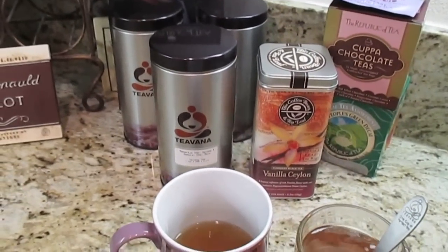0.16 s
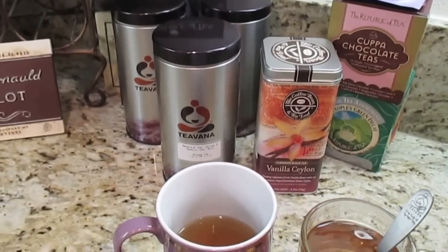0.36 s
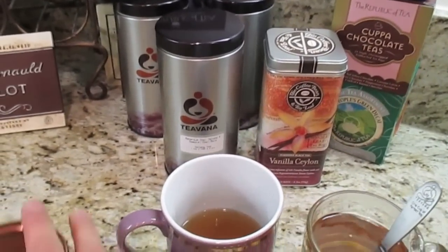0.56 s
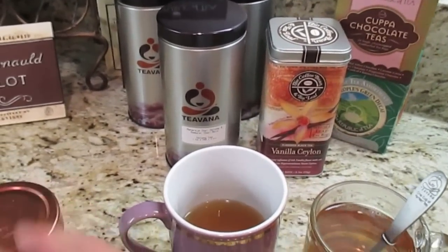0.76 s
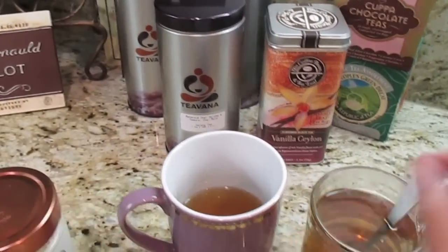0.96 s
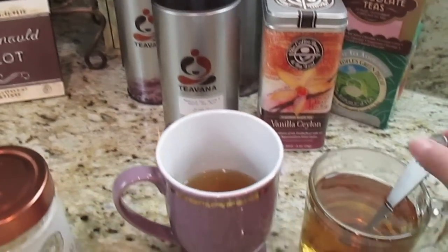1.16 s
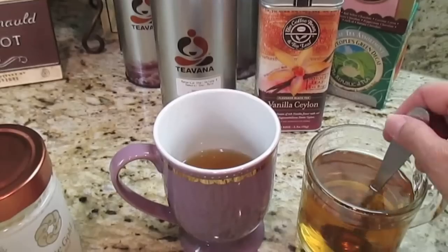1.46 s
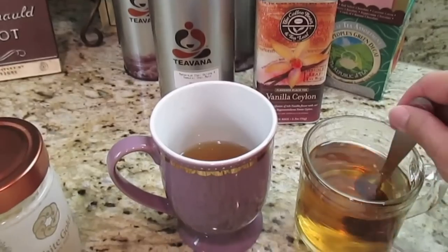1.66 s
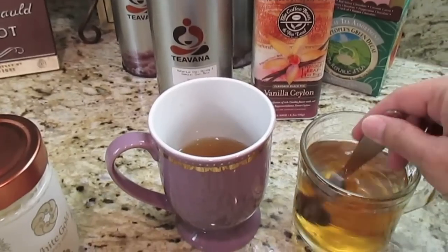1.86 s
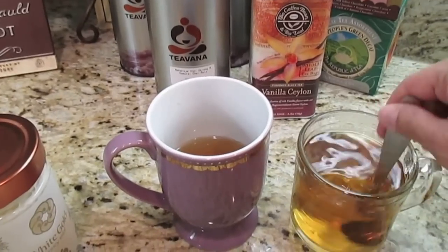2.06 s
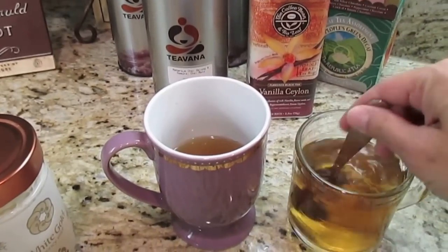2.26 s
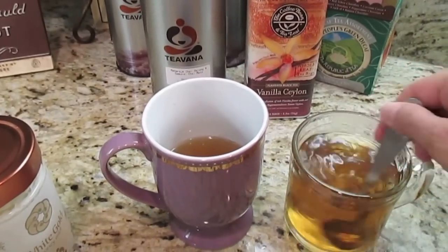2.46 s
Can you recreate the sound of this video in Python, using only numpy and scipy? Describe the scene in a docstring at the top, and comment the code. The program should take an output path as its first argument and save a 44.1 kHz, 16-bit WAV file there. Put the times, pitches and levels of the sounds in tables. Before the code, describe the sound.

A metal spoon clinks in a glass mug of tea. First, a faint bump, then a loud, clipped hollow bang at 0.23 s as a jar lands on stone, small ticks and a rocking bump near 0.4, and a scrape fading by 0.9. Near quiet with low room hum; faint spoon ticks around 1.4. Bright double clink at 1.65, then irregular ringing clinks, bottom knocks and soft rubbing from 1.93 to 2.6.

```python
"""A jar is put down hard on a stone counter, close by, rocks a few times and is slid aside: modes and noise.
Then a spoon is gripped and stirred in a glass mug of tea: it clinks on the wall and knocks the bottom,
as decaying sine modes with noise cracks and thuds. Small ticks and rubbing noise go with both.
A quiet room hums and rustles; the recorder clips the bang and its gain ducks after loud sounds."""
import sys
import numpy as np
from scipy import signal
from scipy.fft import rfft, irfft, next_fast_len
from scipy.io import wavfile
from scipy.ndimage import uniform_filter1d, map_coordinates

SR = 44100
rng = np.random.default_rng(int(sys.argv[2]) if len(sys.argv) > 2 else 0)


def volts_from_db(level):
    """Convert decibel levels to linear amplitude ratios."""
    exponent = np.asarray(level, float) / 20
    return 10 ** exponent


def materialize(psi):
    """Save the field psi as 16-bit PCM at rate SR to the path in sys.argv[1].

    A 1-D psi becomes a single channel; in a 2-D psi each row is a channel.
    """
    bounded = np.clip(np.atleast_2d(psi).T, -1, 1)
    quanta = np.round(bounded * 32767).astype(np.int16)
    wavfile.write(sys.argv[1], SR, quanta)


N = 114660
STRIKE_S = 0.0012  # rise time constant of a hard contact
FLUTTER_PER_S = 140


def unit(x):
    """Scale to rms 1."""
    return x / np.sqrt(np.mean(x ** 2) + 1e-20)


def along(points, hz):
    """Interpolate (hz, value) points on a log frequency axis."""
    point_hz, value = np.transpose(points)
    return np.interp(np.log(hz + 1), np.log(point_hz + 1), value)


def curve(rows):
    """Interpolate (s, value) rows to one value per sample."""
    return np.interp(np.arange(N) / SR, *np.transpose(rows))


def wobble(rate):
    """A smooth random curve, rate knots a second."""
    knots = rng.standard_normal(int(N * rate / SR) + 4)
    return map_coordinates(knots, [np.arange(N) * rate / SR])


def noise(spectrum, n=N):
    """Coloured noise of rms 1 that fades out above the last point."""
    m = next_fast_len(n + 2048)
    closed = list(spectrum) + [(4 * spectrum[-1][0], -100)]
    gain = volts_from_db(along(closed, np.fft.rfftfreq(m, 1 / SR)))
    return unit(irfft(rfft(rng.standard_normal(m)) * gain, m)[:n])


def add(out, start_s, db, modes, attack_s, scatter_db=0, clock=None, flutter_db=0):
    """Ring decaying modes from start_s; clock bends their pitch, flutter shakes each level at random."""
    i = round(start_s * SR)
    t = np.arange(min(N - i, SR // 2)) / SR
    bent_t = t if clock is None else clock[i:i + len(t)] - clock[i]
    hz, level_db, t60_s = np.transpose(modes)[:, :, None]
    knots = rng.standard_normal((len(hz), 200))
    shake = np.array([np.interp(t * FLUTTER_PER_S, np.arange(len(k)), k) for k in knots])
    level_db = level_db + scatter_db * rng.standard_normal(hz.shape) + flutter_db * shake
    rings = volts_from_db(db + level_db - 60 * t / t60_s) * np.sin(2 * np.pi * hz * bent_t)
    out[i:i + len(t)] += rings.sum(0) * (1 - np.exp(-t / attack_s))


def burst(start_s, db, spectrum, t60_s):
    """A puff of noise that starts at start_s and dies."""
    t = np.arange(SR // 5) / SR
    envelope = volts_from_db(db - 60 * t / t60_s) * (1 - np.exp(-2 * t / STRIKE_S))
    return np.pad(envelope * noise(spectrum, len(t)), (round(start_s * SR), N))[:N]


def chatter(ring):
    """The blow followed by a dying spray of small contacts."""
    level_db, t60_s = -5, 0.035
    n = SR // 20
    spray = rng.standard_normal(n) ** 3 * volts_from_db(-60 * np.arange(n) / SR / t60_s)
    return ring + volts_from_db(level_db) * signal.fftconvolve(ring, spray / np.linalg.norm(spray))[:N]


# spoon on glass: start_s, glass_db, spoon_db, bowl_pitch_hz, upper_mode_lean_db
CLINKS = [(1.646, -23, -21, 5420, 8.5), (1.662, -22.5, -20.5, 5437, -4), (1.9322, -35.5, -35.5, 5310, 8),
          (2.067, -30, -27.5, 5520, 4), (2.149, -33.5, -36, 5180, 3.5), (2.191, -22.5, -20, 5060, 0),
          (2.3538, -33, -35.5, 5500, -8), (2.4417, -53, -33, 5220, 4), (2.478, -29, -29.5, 5270, 6.5),
          (2.569, -30.5, -27.5, 5540, 4.5)]
# glass wall modes, in pairs: pitch_hz, level_db, t60_s
GLASS = [(1871, -8, 0.34), (1975, -11, 0.62), (4693, -0.5, 0.24), (4714, 0, 0.26), (8700, -6, 0.09),
         (8480, -7.5, 0.24)]
# spoon modes: pitch_hz, level_db, t60_s
SPOON = [(1345, -5, .12), (2040, -5, .05), (3905, -10, .075), (7020, -7, .18), (9290, -8, .12),
         (11250, -8, .055), (12350, -14, .11)]
# tea climbing the wall loads the glass: time_s, pitch_ratio
SWIRL = [(2.0, 1), (2.2, .989), (2.6, .989)]
# contact noise spectrum: freq_hz, level_db
CRACK = [(500, -20), (1200, -6.5), (4000, -1.5), (10000, -7.5), (16000, -21)]


def clinks():
    """Each contact rings the glass and the spoon, with a noise crack and chatter on the spoon."""
    scatter_db, soft_from_db = 2.5, -22
    soft_db_per_octave = 0.94  # treble lost on the glass for each dB of a weaker blow
    out, clock = np.zeros(N), np.cumsum(curve(SWIRL)) / SR
    upper = np.resize([-1, 1], len(GLASS))[:, None] * [0, 1, 0]
    octaves = np.log2(np.array(GLASS)[:, :1] / GLASS[0][0]) * [0, 1, 0]
    for start_s, glass_db, spoon_db, bowl_hz, lean_db in CLINKS:
        softening = soft_db_per_octave * (glass_db - soft_from_db) * octaves
        glass = np.array(GLASS) + lean_db * upper + softening
        add(out, start_s, glass_db, glass, STRIKE_S, scatter_db / 2, clock, flutter_db=1.5)
        ring = np.zeros(N)
        # the spoon's ring is rough, its level shaking at random
        add(ring, start_s, spoon_db, SPOON, STRIKE_S, scatter_db, flutter_db=4)
        add(ring, start_s, spoon_db - 5, [(bowl_hz, 0, 0.045)], STRIKE_S)
        # short partials, new at every contact
        rattle_hz = np.exp(rng.uniform(np.log(1107.5), np.log(13914), size=16))
        rattle = [(hz, -15.5, 0.068) for hz in rattle_hz]
        add(ring, start_s, spoon_db, rattle, STRIKE_S, scatter_db)
        crack = burst(start_s, spoon_db - 2.5, CRACK, t60_s=0.07)
        out = out + chatter(ring) + crack
    return out


# spoon bowl on the mug bottom: start_s, level_db, stem_db
KNOCKS = [(1.649, -31.5, -25.5), (1.934, -33.5, -24), (2.190, -26, -14), (2.355, -33, -27),
          (2.442, -19.5, -44), (2.449, -21.5, -53), (2.477, -24, -39), (2.572, -24.5, -28)]
# mug and counter modes: pitch_hz, level_db, t60_s
BASE = [(284.6, -10, .06), (510, -1, .06), (743, 0, .05), (862, -5, .06), (1060, -4, .05), (1395, -9, .07)]
# spectrum of thuds and brisk rubbing: freq_hz, level_db
WIDE = [(90, -15), (220, -8), (800, 1), (1150, -8.5), (2500, -16.5)]


def knocks():
    """Each knock rings mug and counter under the spoon stem's thin high ring, with a dull noise thud."""
    out = np.zeros(N)
    for start_s, db, stem_db in KNOCKS:
        add(out, start_s, stem_db, [(9050, 0, 0.12)], STRIKE_S, flutter_db=2)
        detune = 0.02 * rng.standard_normal((len(BASE), 1)) * [1, 0, 0]
        add(out, start_s, db, np.array(BASE) * (1 + detune), STRIKE_S, scatter_db=1.25, flutter_db=4)
        out = out + burst(start_s, db - 4, WIDE, t60_s=0.075)
    return out


# jar on stone: start_s, level_db, edge_slap_db
BUMPS = [(0.019, -27, -71), (.226, -7.5, -24), (0.2324, 8.5, -14), (0.436, -20, -48)]
# jar modes: pitch_hz, level_db, t60_s
JAR = [(95, -30, 0.23), (300, -14, 0.05), (430, -8, .035), (517.7, 3.5, .031), (640, -10, 0.03),
       (849, -8, .04), (1012, -12, .04)]
# hard edge noise spectrum: freq_hz, level_db
SLAP = [(700, -21), (1400, -6), (5300, -9.5), (11000, -18.5), (16000, -37)]


def jar():
    """Hollow bumps of short low modes, with a noise slap as the hard edge lands."""
    out = np.zeros(N)
    for start_s, db, slap_db in BUMPS:
        add(out, start_s, db, JAR, attack_s=0.0022)
        out = out + burst(start_s, slap_db, SLAP, t60_s=0.086)
    return out


# scuffs and ticks of jar, finger and nail: start_s, level_db, pitch_hz, t60_s
TICKS = [(0.18, -29.5, 980, 0.04), (.212, -13.5, 651, 0.08), (.371, -26.5, 820, 0.1),
         (.402, -25.5, 830, 0.045), (.436, -23, 952, 0.16), (.4365, -26.5, 1860, 0.09),
         (1.369, -40, 2256, 0.027), (1.464, -30.5, 5630, 0.014), (1.5, -26.5, 2850, 0.011)]


def ticks():
    """Short clicks, each a brief ring with noise around its pitch."""
    out = np.zeros(N)
    for start_s, db, hz, t60_s in TICKS:
        add(out, start_s, db, [(hz, 0, t60_s)], STRIKE_S)
        spectrum = [(hz * 0.15, -35), (hz, 0), (hz * 1.57, -14)]
        out = out + burst(start_s, db - 0.5, spectrum, t60_s)
    return out


# jar dragging on the stone: time_s, level_db
SLIDE = [(0, -43), (.05, -46.5), (.165, -60.5), (.19, -28), (.3, -29), (.46, -32), (.6, -35), (.76, -40),
         (.9, -63.5)]
# drag noise spectrum: freq_hz, level_db
DRAG = [(180, -22), (400, -8), (600, -5), (720, -9), (850, 0), (950, -11), (1065, 0), (1220, -18),
        (3000, -32)]


def jar_slide():
    """Jar rubbing on stone: lumpy noise in the band of the jar."""
    lumps = volts_from_db(2 * wobble(110))
    return volts_from_db(curve(SLIDE)) * unit(lumps * noise(DRAG))


# spoon and tea moving in the mug: time_s, level_db
RUB = [(1.22, -81), (1.3, -56), (1.9, -52), (1.96, -41), (2.1, -50.5), (2.33, -47.5), (2.38, -39),
       (2.6, -45.5)]
# slight movement spectrum: freq_hz, level_db
NARROW = [(330, -17), (550, -4.5), (750, -28)]


def mug_rub():
    """Spoon and tea moving: lumpy noise whose band widens as the movement gets louder."""
    wide_from_db = -50
    rub_db = curve(RUB)
    brisk = volts_from_db(2.76 * np.minimum(rub_db - wide_from_db, 0))
    lumps = volts_from_db(3 * wobble(70))
    return volts_from_db(rub_db) * lumps * (brisk * noise(WIDE) + (1 - brisk) * noise(NARROW))


# room answer decay: freq_hz, t60_s
ROOM = [(200, 0.32), (2000, 0.38), (12000, 0.22)]


def kitchen(x):
    """Room answer as a noise tail: each frequency dies at its own speed."""
    hz, t, z = signal.stft(rng.standard_normal(SR // 2), SR, nperseg=256)
    decay = volts_from_db(-60 * t / along(ROOM, hz)[:, None])
    tail = signal.istft(z * decay, SR, nperseg=256)[1]
    delayed = np.pad(x, (150, 0))
    return signal.fftconvolve(delayed, tail / np.linalg.norm(tail))[:N]


# room hush spectrum: freq_hz, level_db
HUSH = [(30, -36), (80, 0.5), (163, -4.5), (388, -14.5), (2200, -27), (4000, -34.5), (6400, -35),
        (11400, -48.5), (16300, -53)]
# wavering low hum: time_s, pitch_hz, level_db
RUMBLE = [(0, 52.2, -43.5), (.24, 56.4, -45), (0.328, 56.7, -51.5), (1.6, 53, -57.5), (1.8, 44.9, -48.5),
          (2.6, 39.8, -54)]


def room_tone():
    """Noise hush with faint rustling flickers, over a low sine hum wavering in pitch and level."""
    hush = volts_from_db(0.84 * wobble(6.24)) * noise(HUSH)
    rustle = volts_from_db(-8.0 + 2.97 * wobble(60)) * noise(CRACK)
    time_s, hz, db = np.transpose(RUMBLE)
    hum_hz = curve(np.c_[time_s, hz]) + 3.3 * wobble(19)
    hum_db = curve(np.c_[time_s, db]) + 1.4 * wobble(2.7)
    hum = np.sqrt(2) * np.sin(2 * np.pi * np.cumsum(hum_hz) / SR)
    return volts_from_db(-51) * (hush + rustle) + volts_from_db(hum_db) * hum


def scene():
    """Sum the hits, their room answer, the rubbing and the room tone."""
    hits = clinks() + knocks() + jar() + ticks()
    room = volts_from_db(-14) * kitchen(hits)
    return (hits + room + jar_slide() + mug_rub() + room_tone())[None]


def band_limit(x):
    """A steep low-pass at the top of the band."""
    return signal.sosfilt(signal.butter(12, 16480, fs=SR, output="sos"), x)


def record(dry):
    """Gain control turns down after loud sounds and creeps back; then peaks clip on a soft knee."""
    duck_from_db, duck_share, recover_db_per_s, lag_s = -19.5, 0.57, 6, 0.044
    top, knee = 1.0, 6
    recovery_db = recover_db_per_s * np.arange(N) / SR
    level_db = 10 * np.log10(np.abs(uniform_filter1d(dry[0] ** 2, size=441)) + 1e-12)
    over_db = duck_share * np.maximum(level_db - duck_from_db, 0)
    held_db = np.maximum.accumulate(over_db + recovery_db) - recovery_db
    k = 1 / (lag_s * SR)
    ducked = dry * volts_from_db(-signal.lfilter([k], [1, k - 1], held_db))
    clipped = ducked / (1 + np.abs(ducked / top) ** knee) ** (1 / knee)
    return band_limit(clipped)


dry = scene()
out = record(dry)
materialize(out)
```